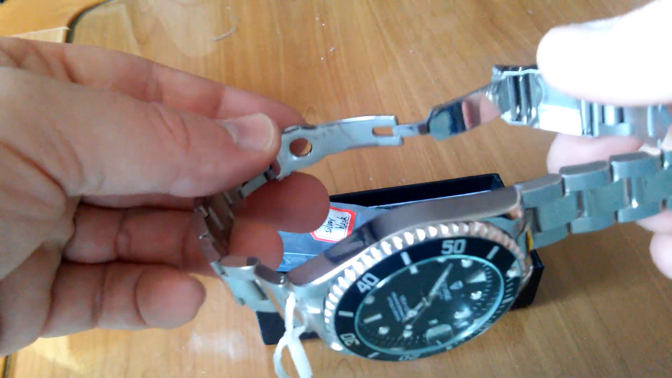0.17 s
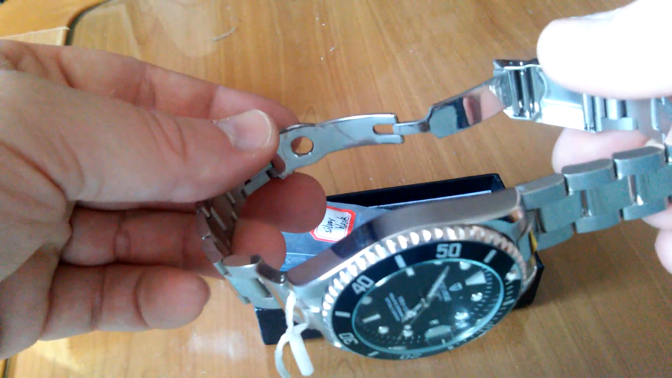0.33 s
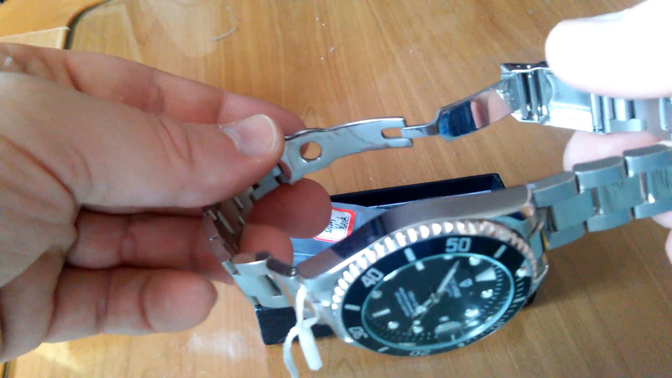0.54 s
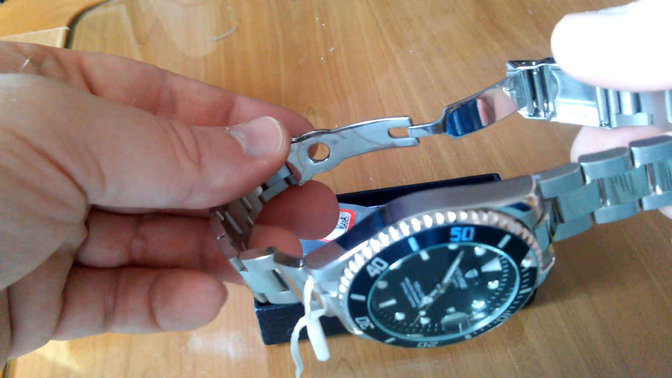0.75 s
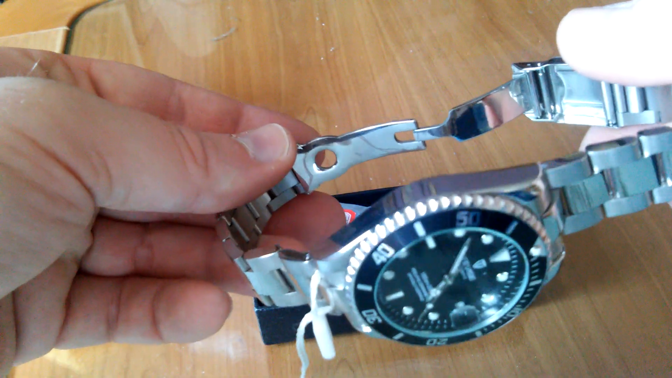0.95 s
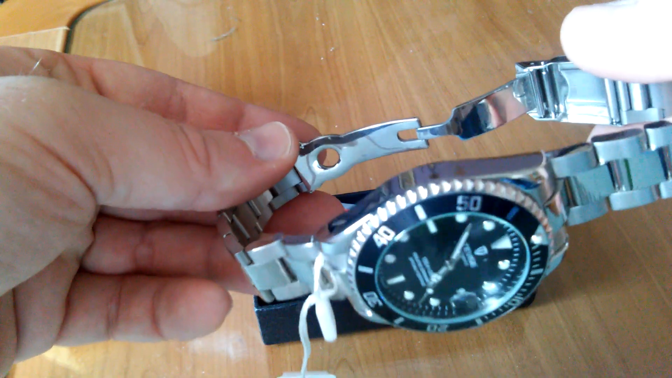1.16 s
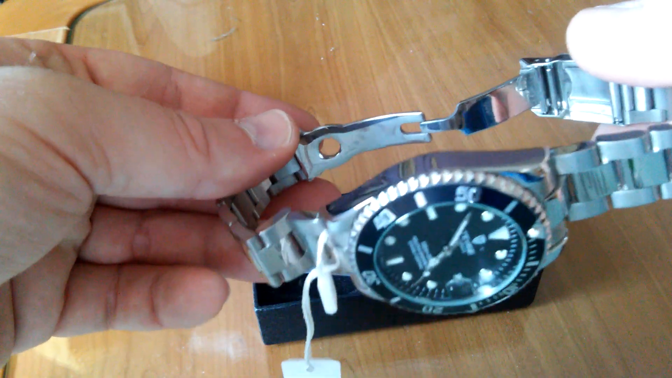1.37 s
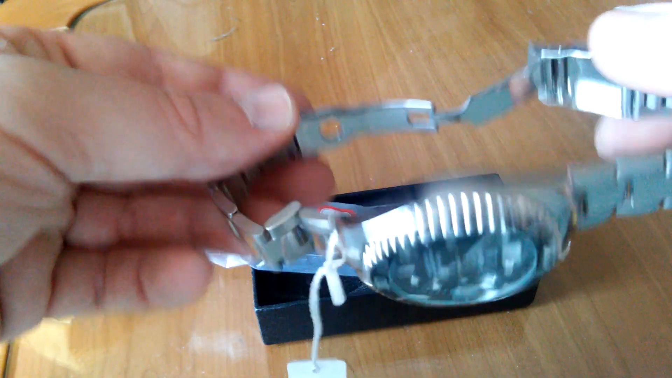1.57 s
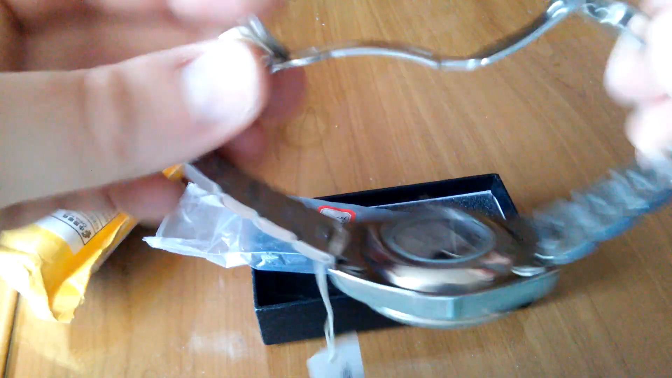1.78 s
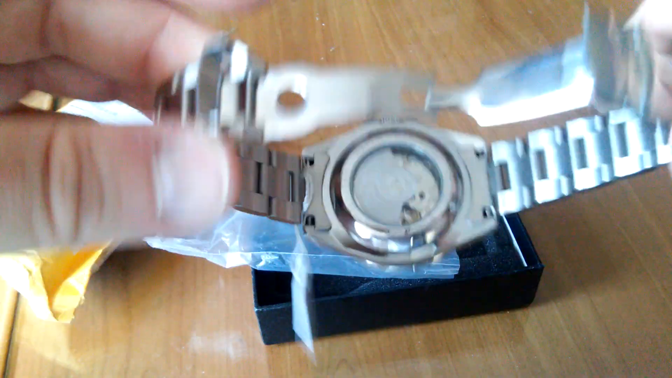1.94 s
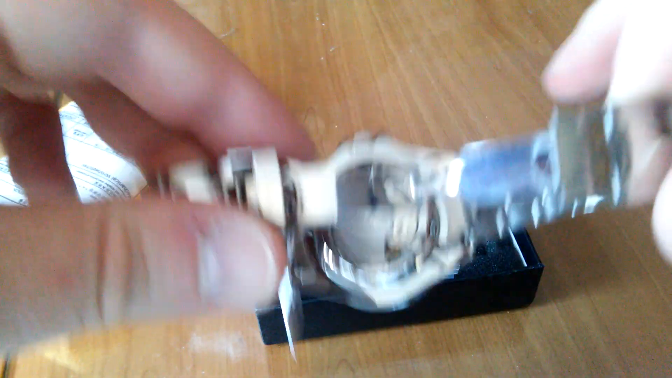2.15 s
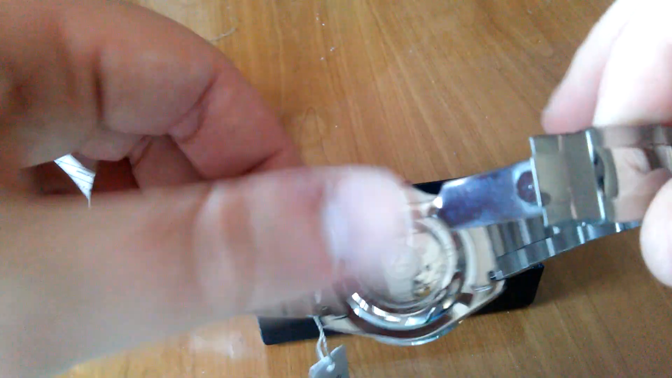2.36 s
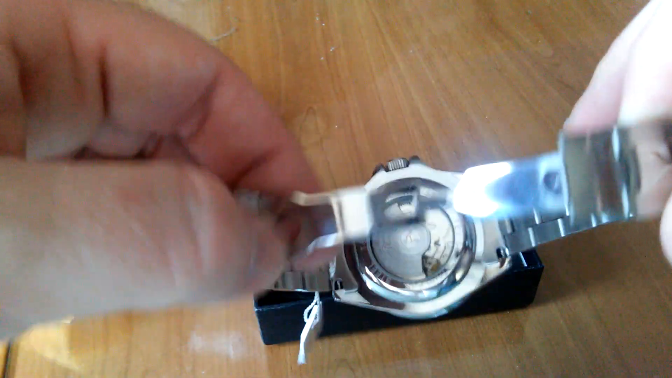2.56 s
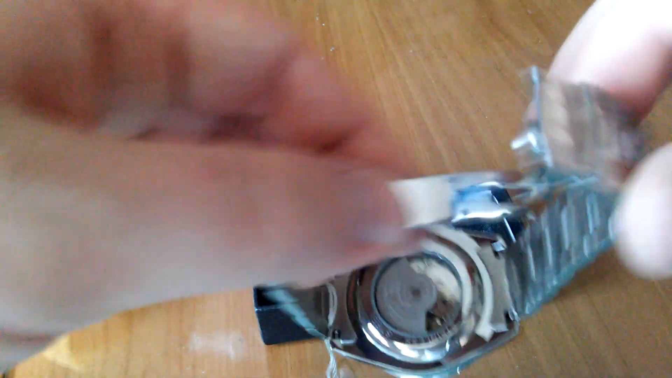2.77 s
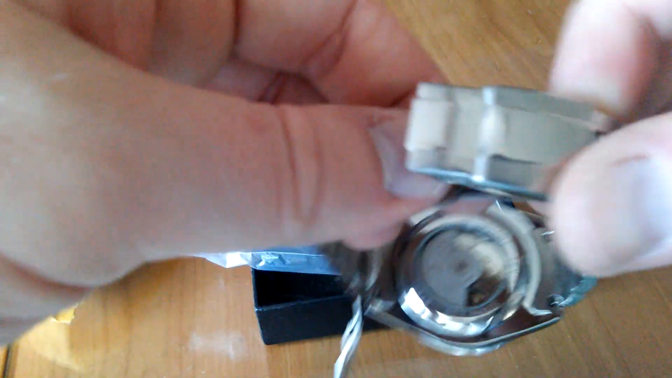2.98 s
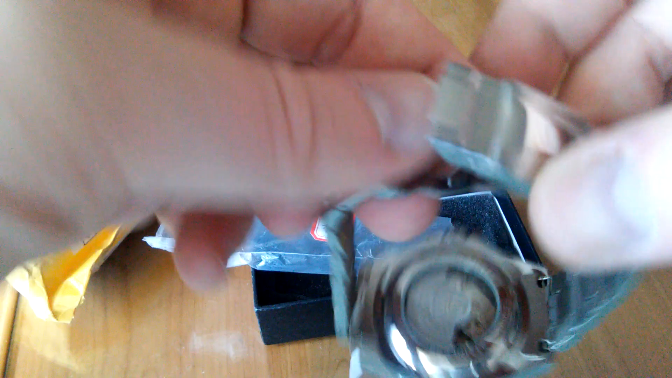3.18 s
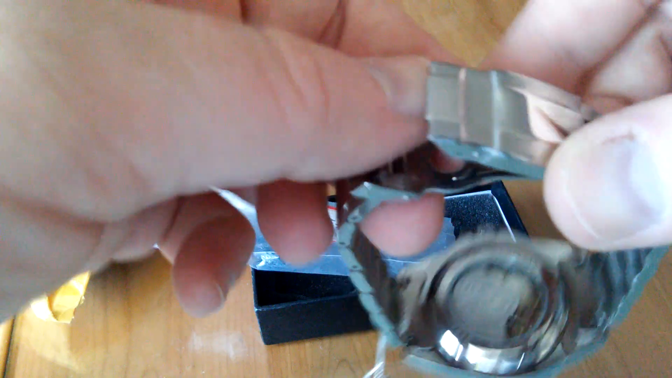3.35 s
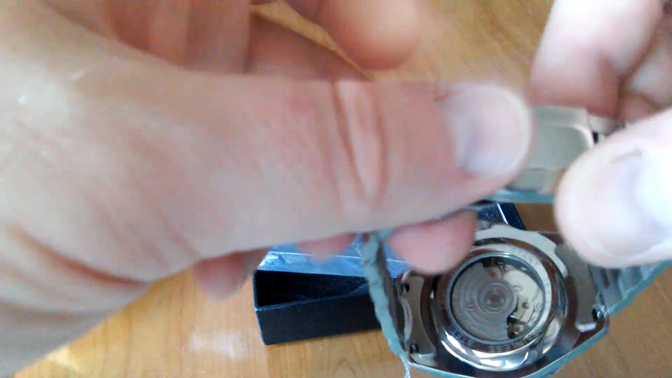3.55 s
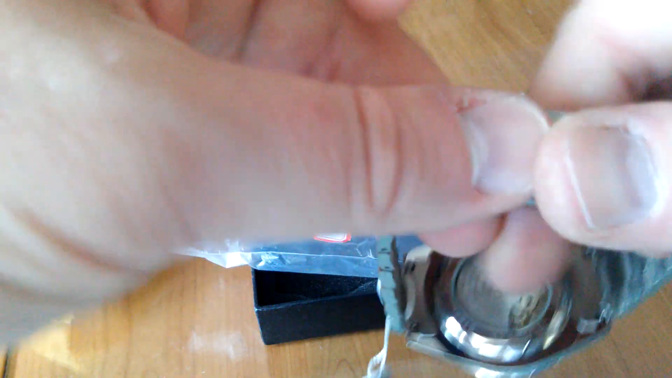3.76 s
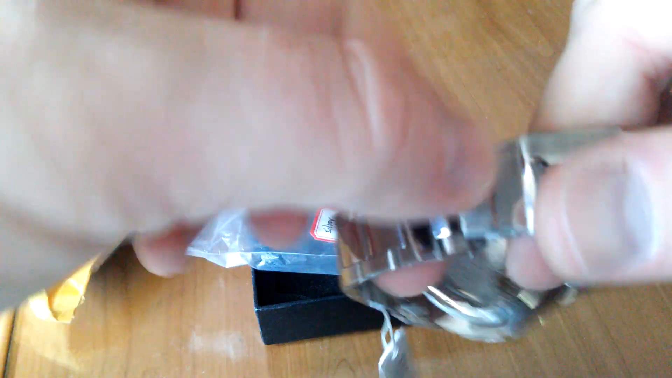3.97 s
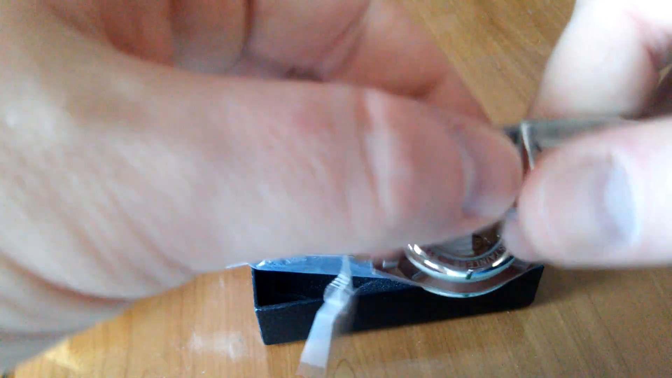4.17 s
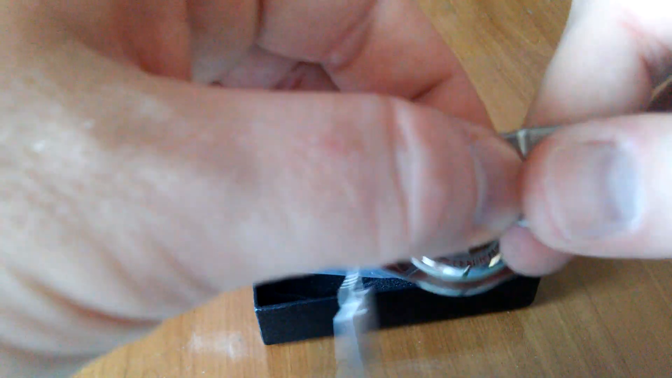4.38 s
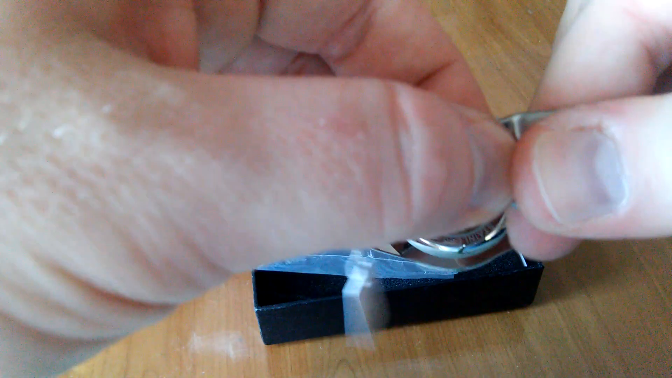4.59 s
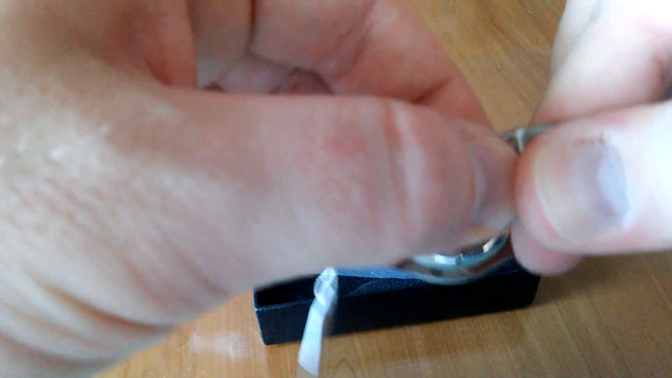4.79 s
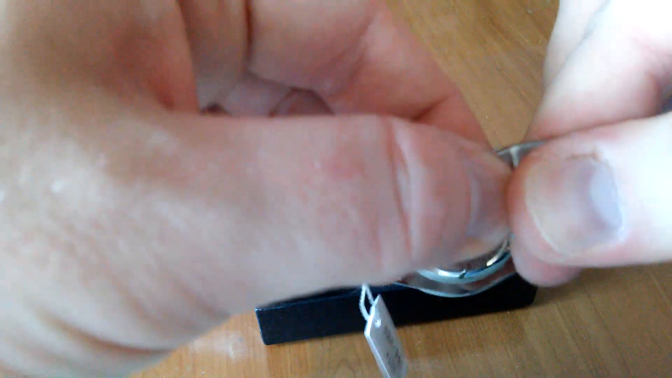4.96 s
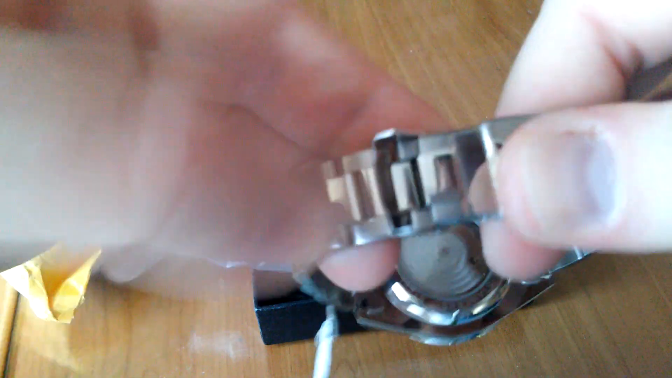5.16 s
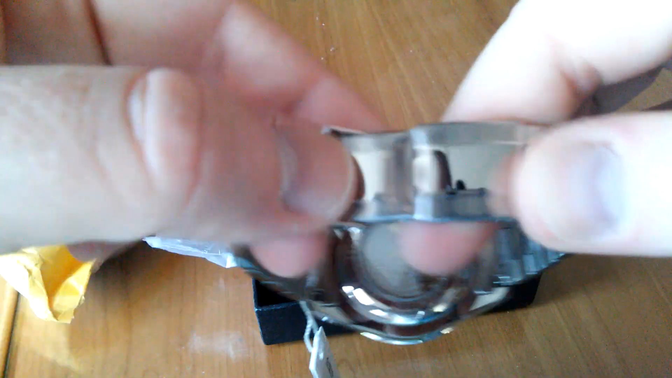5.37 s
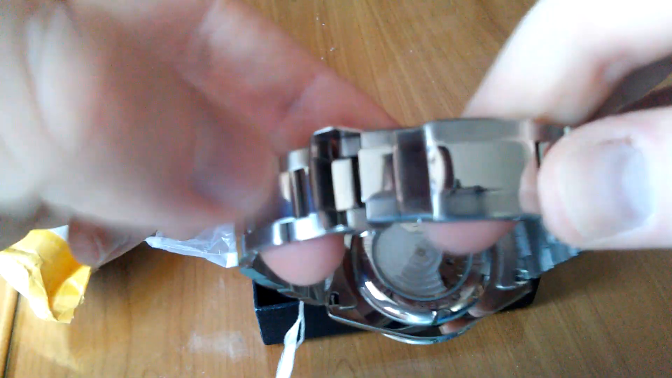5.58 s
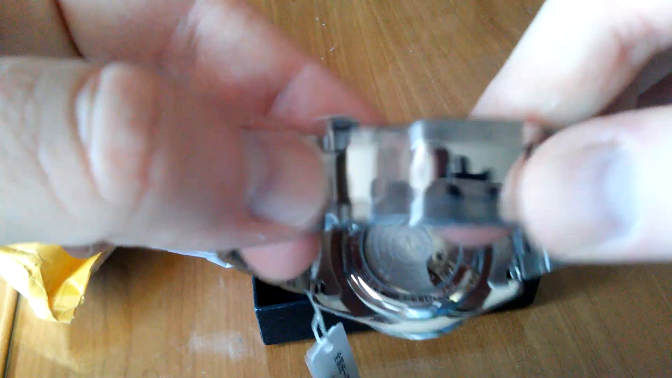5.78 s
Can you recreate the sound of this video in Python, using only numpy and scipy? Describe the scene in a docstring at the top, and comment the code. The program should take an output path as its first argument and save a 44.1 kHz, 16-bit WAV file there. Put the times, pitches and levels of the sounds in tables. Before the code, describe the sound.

Handling of a metal watch over a table: nearly two seconds of quiet hiss and faint rasps, then sparse ticks growing into sharp, glassy clicks with light box taps. Near the end a hard clasp snap distorts and briefly blanks the close microphone, leaving a bright room tail, low thuds and a last run of link clicks.

```python
"""Faint rasps over hiss and low table rumble come first; then a steel watch bracelet turns in the hands.
Link clicks, knocks on a cardboard box and the snap are bursts of noise through resonances,
rubbing is steadier noise through such resonances, and wrist thuds are short low sines.
The clasp snaps shut so hard that the close microphone goes deaf for a moment and lurches back.
A synthetic room answers clicks, knocks and snap; coarse level steps and a steep treble limit come last."""
import sys
import numpy as np
from scipy import signal
from scipy.fft import rfft, irfft, next_fast_len
from scipy.io import wavfile
from scipy.ndimage import uniform_filter1d

SR = 44100
rng = np.random.default_rng(int(sys.argv[2]) if len(sys.argv) > 2 else 0)


def store_wav(level_fs):
    """Save 16-bit WAV to argv[1]."""
    pcm = np.round(np.clip(np.atleast_2d(level_fs), -1, 1) * 32767)
    wavfile.write(sys.argv[1], SR, pcm.T.astype(np.int16))


N = 257103

# Link clicks: (time [s], bright ring peak [dB], bright ring pitch [Hz], housing ring under it [dB],
# chatter t60 [s], room energy against the near sound [dB])
LINK_CLICKS = [(1.7887, -54, 12500, -31, .013, -19), (1.9318, -47.5, 9600, -21, .01, -8),
               (1.9517, -49.5, 11600, -32, .011, -16), (2.0522, -52.5, 12800, -26, .012, -12),
               (2.2399, -37, 13600, -23.5, .009, -15), (2.4045, -46, 11300, -32, .012, -8),
               (2.4164, -49, 11600, -25, .012, -12), (2.4329, -32, 8740, -13.5, .012, -1),
               (2.5552, -35.5, 10000, -36, .019, -22), (2.5624, -44, 13300, -29, .012, -17),
               (2.6002, -40, 13500, -32, .013, -11), (2.608, -44, 12200, -19, .012, -18),
               (2.6214, -45, 11300, -20, .012, -17), (2.6398, -33, 13000, -25, .01, -8),
               (2.6615, -11, 12850, -26.5, .01, -17), (2.829, -48, 8500, -35, .008, -15),
               (2.926, -47, 9470, -21, .016, -10), (2.9358, -32, 11200, -30, .016, -6),
               (2.9552, -38, 10100, -20, .012, -5.5), (2.9731, -41, 14300, -15, .014, -11),
               (2.9907, -36.5, 11600, -22, .012, -13), (3.1038, -32, 12500, -25, .008, -17.5),
               (3.175, -3, 13570, -29, .015, -12.5), (3.2944, -35, 12300, -10, .007, -13.5),
               (3.3814, -32, 14400, -32, .009, -11), (3.3845, -23, 13900, -23.5, .016, -15),
               (3.4214, -27.5, 11400, -20, .025, -23), (3.436, -19.5, 10300, -30, .036, -16.5),
               (3.456, -11, 11400, -26, .03, -6), (3.5663, -27.5, 12000, -21, .016, -16.5),
               (3.5999, 1.5, 11900, -36, .009, -17), (3.625, -24, 13700, -37, .013, -14),
               (3.641, -28.5, 12300, -33, .012, -12), (3.693, -28, 11300, -30.5, .013, -10.5),
               (3.7125, -32, 12100, -38, .016, -9), (3.8217, -39.5, 12550, -40, .017, -4),
               (3.8466, -37, 13500, -36.5, .012, -4), (3.8607, -37.5, 8900, -31, .009, -19),
               (3.9098, -46, 9050, -34, .009, 0), (3.934, -34, 14300, -23, .013, -15),
               (4.0056, -44, 11320, -40, .01, -6), (4.0203, -30, 12670, -42, .018, -11.5),
               (4.3926, -1.5, 10000, -16, .0075, -16), (4.4439, -25, 12500, -26, .012, -19),
               (4.4683, -13, 11500, -25.5, .007, -28), (4.5937, -49, 11780, -29, .018, -5),
               (5.202, -33, 8000, -30, .015, -15), (5.2251, -27, 9510, -31, .018, -17.5),
               (5.2659, -8, 9700, -28, .01, -22.5), (5.3254, -28, 9420, -43, .011, -15),
               (5.3684, -23.5, 11200, -20, .012, -12), (5.3765, -19, 9640, -15, .01, -6),
               (5.3843, -30, 13100, -8, .012, -15), (5.404, -20, 10500, -20.5, .011, -8),
               (5.439, -23, 13300, -28.5, .013, -16.5), (5.5101, -9, 13000, -50, .009, -19),
               (5.519, -23, 13400, -20, .008, -4.5), (5.5593, -27.5, 10370, -45, .014, -14.5),
               (5.5812, -23, 12800, -49, .018, -20), (5.6125, -40, 14000, -32, .011, -9),
               (5.657, -38, 10100, -36, .011, -17), (5.726, -42, 11830, -27, .011, -1),
               (5.8151, -33, 13300, -18, .01, -3)]
LOW_RING_DB, LOW_PER_DB, LOW_SCATTER_DB = -23, -.15, 4  # lower ring: at a 0 dB blow, per dB of blow, chance
BODY_DB, BODY_PER_DB = -23.5, .16  # dull body, before the noise drives it: at a 0 dB blow, per dB of blow
# Ring of the microphone housing: (pitch [Hz], t60 [s], sharp at first by [Hz], settling time constant [s])
HOUSING_RING = (4100, 0.02, 900, 0.0012)
# The clasp: (time [s], crack peak [dB], crack rise [s], housing ring [dB], room answer [dB])
CLASP_SNAP = (4.9795, -1, .0003, -13.5, -17.5)
# Microphone deafness: (start [s], end [s], held offset before smoothing [full scale])
MIC_DEAF = (4.9812, 5.0115, .11)
# Lurches of the overloaded microphone: (time [s], size before smoothing [full scale], rise [s])
MIC_LURCHES = [(4.9799, -.62, .0005), (4.9813, .24, .002), (4.9995, .09, .0016), (5.0122, .16, .0022),
               (5.023, -.135, .047), (5.12, .02, .07)]
# Colour of the room's answer to the clasp: (frequency [Hz], level [dB per Hz])
CLASP_ECHO_COLOUR = [(180, -80.5), (300, -35), (584, -24.5), (737, -21.5), (900, -13), (1100, -10),
                     (1190, -14), (2740, -14.5), (3700, -21), (4600, 0), (5200, 3), (5900, -9), (6850, -12),
                     (9500, -4), (12100, 4), (15000, -1.5), (16000, -7.5)]
# Knocks on the box: (time [s], lid peak [dB], bottom thump under it [dB], rattle t60 [s],
# room energy against the near sound [dB])
BOX_KNOCKS = [(2.428, -26.5, -26, 0.031, -3), (2.433, -32, -8, 0.05, -8), (2.464, -33, -15, 0.036, -8),
              (2.943, -37, -9.5, 0.031, 0), (2.954, -33.5, -14.5, 0.059, -12.5),
              (3.421, -32.5, -16, 0.034, -13), (3.438, -12.5, -26.5, 0.017, -11.5),
              (3.456, -13.5, -21, 0.029, -8.5), (5.369, -14.5, -25, 0.019, -12),
              (5.384, -18, -24, 0.04, -10.5), (5.523, -27, -33, 0.022, -13.5),
              (5.816, -42, -20, 0.025, -14), (5.827, -35, -44, 0.027, -10)]
# Modes of the cardboard box: (frequency [Hz], width before any blur [Hz], level before scatter [dB])
BOX_MODES = [(233, 24, -5), (387.4, 45, -6.5), (735, 28, 3.5), (929.5, 38, -8), (1102, 22, -7),
             (1390, 96, -3.5), (1877, 70, 4), (2045, 230, -5), (2320, 97, 0), (2626, 150, -5.5),
             (3040, 510, -12.5), (3560, 120, -11)]
# The watch drags over the box: (time [s], level [dB])
DRAG_LEVEL = [(3.5, -100), (3.65, -66), (3.75, -72), (3.87, -62), (3.94, -68), (4.0, -100)]
# Links sliding on each other: (time [s], level [dB])
SLIDE_LEVEL = [(0, -100), (1.7, -98), (1.95, -84), (2.2, -90), (2.4, -86), (2.6, -66), (2.9, -73),
               (3.3, -74), (3.75, -65.5), (3.9, -62), (4.0, -70), (4.08, -64), (4.2, -90), (4.6, -84),
               (4.75, -95), (5.5, -89), (5.68, -58), (5.8, -90)]
# Soft wrist thuds on the table: (time [s], envelope peak [dB], pitch [Hz])
WRIST_THUDS = [(1.621, -78, 166.6), (2.28, -64, 97), (2.77, -66, 165), (3.19, -65, 172),
               (3.83, -55.5, 169.6), (4.22, -67.5, 164.8), (4.44, -58, 164), (4.58, -60, 105.4),
               (5.1, -42, 105.6), (5.179, -42, 96.8), (5.25, -48, 84)]
THUD_RISE_S = .02
# The table hums on after the snap: (time [s], envelope peak [dB], pitch [Hz], rise [s])
TABLE_HUM = (5.3, -59, 82, .22)
# Hands on the table: (time [s], rumble level [dB])
HAND_RUMBLE = [(0, -94), (.5, -87), (.8, -90), (1.25, -76), (1.5, -78), (2.0, -87), (2.2, -77), (2.72, -72),
               (3.1, -83), (3.22, -67), (3.35, -77), (3.75, -72), (3.95, -64), (4.2, -80), (4.45, -68),
               (4.62, -67), (4.72, -76), (5.83, -80)]
SHAKE_DB, SHAKE_RISE_S = -45, .045  # a box knock shakes the table: level against the knock, rise
# The clasp shakes the table too: (time [s], level [dB], rise [s])
CLASP_SHAKE = (5.05, -49, .09)
# Faint rasps far off: (time [s], level [dB], length [s])
FAR_RASPS = [(0.565, -85, 0.11), (0.949, -81, .12), (1.334, -80, .07), (1.699, -80, 0.087),
             (2.053, -87, .08), (2.769, -77, 0.062), (4.205, -77, 0.098)]
# Colour of the microphone's hiss: (frequency [Hz], relative level [dB per Hz])
HISS_COLOUR = [(71, -44.5), (120, -15.5), (160, -5), (336, -18), (413, -18), (600, -19), (740, -11),
               (900, -19), (1710, -19), (14900, -20), (16500, -24.5)]
HISS_DB = -88
# Room decay before any lingering: (frequency [Hz], t60 [s])
ROOM_DECAY = [(200, 0.24), (1000, 0.29), (2500, 0.32), (5000, 0.37), (10000, 0.37), (16000, 0.27)]
# The room's answer against the near sound: (frequency [Hz], level [dB])
ROOM_TINT = [(200, 1.5), (1000, 4), (3000, 3.5), (6000, -5.5), (16000, -6.5)]
WALL_S = .0105  # delay of the first wall answer [s]
STEP = .00046  # the converter's coarse step [full scale]
TOP_HZ = 17150  # nothing passes from here up


def clicks():
    """Steel on steel: brief chatter drives two broad rings and a dull body; the housing rings on."""
    s, db, hz, housing_db, t60, room_db = np.transpose(LINK_CLICKS)[:, :, None]
    low_db = LOW_RING_DB + LOW_PER_DB * db + LOW_SCATTER_DB * rng.standard_normal(db.shape)
    t = np.arange(SR // 20) / SR
    onset = 1 - np.exp(-t / .0001)
    chatter = rng.standard_normal((len(s), len(t))) * amp(-60 * t / t60) * onset
    width = np.interp(db, [-45, -5], [2000, 8000])  # a harder blow wakes more of the link

    def steel(f):
        high = peak(f, hz, width) * peak(f, 13700, 7200)
        return high - amp(low_db) * peak(f, 6200, 2800) ** 2

    def body(f):
        return amp(BODY_DB + BODY_PER_DB * db) * peak(f, 2200, 3600)

    def spread(f):
        housing = amp(housing_db + 7) * np.abs(peak(f, 4400, 1100)) ** 2
        return np.abs(steel(f)) + housing + amp(-7) * np.abs(body(f))

    bright = top_at_one(filtered(chatter, steel))
    near = amp(db) * (bright + housing_ring(t, housing_db) + filtered(chatter, body))
    return placed(s[:, 0], near, spread, room_db)


def housing_ring(t, db):
    """The housing starts sharp and slides down to its pitch as it dies away."""
    hz, t60, sharp_hz, settle = HOUSING_RING
    turns = hz * t + sharp_hz * settle * (1 - np.exp(-t / settle))
    onset = 1 - np.exp(-t / 0.0017)
    return amp(db - 60 * t / t60) * onset * np.sin(2 * np.pi * turns)


def overload():
    """The snap itself: a noise crack, the housing ring, and the offset and lurches of the stunned microphone."""
    s, crack_db, rise, ring_db, _ = CLASP_SNAP
    time = np.arange(N) / SR
    t = np.clip(time - s, 0, None)
    burst = rng.standard_normal(N) * swing(t / rise)
    crack = top_at_one(filtered(burst, lambda f: peak(f, 6000, 21000) - .8 * peak(f, 1800, 2500)))
    held = MIC_DEAF[2] * np.interp(time, [4.983, 5.000, 5.016, 5.022], [0, 1, 1, 0])
    lurch = sum(size * swing((time - at) / slow) for at, size, slow in MIC_LURCHES)
    smooth = filtered(held + lurch, lambda f: 1 / (1 + 1j * f / 4000) ** 2)
    return amp(crack_db) * crack + housing_ring(t, ring_db) + smooth


def snap_echo():
    """The room rings on after the clasp shuts: a coloured noise tail that lingers longer than usual."""
    out = np.zeros(N + SR)
    tail = filtered(tails(1, linger=1.15)[0], lambda f: amp(along(CLASP_ECHO_COLOUR, f)))
    tail /= np.sqrt(np.mean(tail[1500:4000] ** 2))  # level is set on an early stretch
    out[round((CLASP_SNAP[0] + WALL_S) * SR):][:len(tail)] = amp(CLASP_SNAP[4]) * tail
    return out[:N]


def knocks():
    """A short scrape drives the box's modes at new strengths each time; the bottom swells later."""
    s, db, thump_db, rattle, room_db = np.transpose(BOX_KNOCKS)[:, :, None]
    t = np.arange(SR // 5) / SR
    noise = rng.standard_normal((len(s), len(t)))
    scatter = amp(1.54 * rng.standard_normal((len(s), len(BOX_MODES))))

    def modes(f, low, blur=1):
        total = 0
        for k, (hz, width, level) in enumerate(BOX_MODES):
            if (hz < 500) == low:
                total = total + (-1) ** k * amp(level) * scatter[:, [k]] * peak(f, hz, blur * width)
        return total

    def clatter(f):  # too many small modes to tell apart
        return amp(-15) * peak(f, 1700, 2200) ** 2

    def spread(f):
        low = amp(thump_db + 8) * np.abs(modes(f, True, blur=1.6))
        return np.abs(modes(f, False, blur=3.5)) + np.abs(clatter(f)) + low

    lid = top_at_one(filtered(noise * amp(-60 * t / rattle), lambda f: modes(f, False) + clatter(f)))
    bottom = top_at_one(filtered(noise * t * np.exp(-t / 0.0086), lambda f: modes(f, True) ** 2))
    return placed(s[:, 0], amp(db) * (lid + amp(thump_db) * bottom), spread, room_db)


def dragging():
    """A soft, uneven rub keeps the box's modes murmuring."""
    noise, lumps = rng.standard_normal((2, N))
    rub = noise * amp(3 * unit(uniform_filter1d(lumps, size=300)))

    def box(f):
        return sum((-1) ** k * amp(db) * peak(f, hz, 1.5 * width)
                   for k, (hz, width, db) in enumerate(BOX_MODES))

    return amp(curves(DRAG_LEVEL)[0]) * unit(filtered(rub, box))


def sliding():
    """Links rub: a bright noise whisper roughened by sparse tiny ticks."""
    strength = amp(3.5 * rng.exponential(size=N).clip(0, 4))
    ticks = (rng.random(N) < 250 / SR) * strength  # about 250 a second
    roughness = 1 + 0.62 * signal.lfilter([1], [1, -.96], ticks)
    rub = rng.standard_normal(N) * roughness
    return amp(curves(SLIDE_LEVEL)[0]) * unit(filtered(rub, lambda f: peak(f, 11500, 7600) ** 2))


def wrist_thuds():
    """Wrist thuds and the table's hum: low sines that swell and die away."""
    t = np.arange(N) / SR
    tones = [(*row, THUD_RISE_S) for row in WRIST_THUDS] + [TABLE_HUM]
    return sum(amp(db) * swing((t - s) / rise) * np.sin(2 * np.pi * hz * (t - s))
               for s, db, hz, rise in tones)


def table_rumble():
    """Hands, knocks and clasp shake the table: noise through its low resonances."""
    t = np.arange(N) / SR
    hand_noise, knock_noise = rng.standard_normal((2, N))
    clasp_s, clasp_db, clasp_rise = CLASP_SHAKE
    level = amp(curves(HAND_RUMBLE)[0]) + amp(clasp_db) * swing((t - clasp_s) / clasp_rise)
    deep = unit(filtered(hand_noise, lambda f: peak(f, 66, 50) ** 2 + 0.4 * peak(f, 37, 21)))
    shake = sum(amp(db + SHAKE_DB) * swing((t - s) / SHAKE_RISE_S) for s, db, *_ in BOX_KNOCKS)
    jolt = unit(filtered(knock_noise, lambda f: peak(f, 75, 70) ** 2 + 1.2 * peak(f, 140, 90) ** 2))
    return level * deep + shake * jolt


def rasps():
    """Far-off rasps: rough pulses, 150 a second, through two narrow throat-like rings."""
    t = np.arange(N) / SR
    gate = 0
    for s, db, length in FAR_RASPS:
        fade_in = np.clip((t - s) / 0.0064, 0, 1)
        fade_out = np.clip((s + length - t) / 0.034, 0, 1)
        gate = gate + amp(db) * fade_in * fade_out
    pulses = np.diff(np.floor(150 * t), prepend=0) * 17 + 1.3 * rng.standard_normal(N)
    return gate * unit(filtered(pulses, lambda f: peak(f, 1340, 410) ** 2 + 0.39 * peak(f, 2300, 370) ** 2))


def microphone_hiss():
    """The microphone's own hiss: steady coloured noise."""
    return amp(HISS_DB) * unit(filtered(rng.standard_normal(N), lambda f: amp(along(HISS_COLOUR, f))))


def tails(count, linger=1):
    """Room answers of energy 1, a fresh one per sound; each frequency dies at its own speed."""
    noise, lumps = rng.standard_normal((2, count, SR // 2))
    early = np.exp(-np.arange(SR // 2) / SR / .08)  # single reflections stand out at first
    lumpy = noise * amp(2.5 * early * unit(uniform_filter1d(lumps, size=40)))
    hz, t, z = signal.stft(lumpy, SR, nperseg=256)
    decay = amp(-60 * t / (linger * along(ROOM_DECAY, hz)[:, None]))
    x = signal.istft(z * decay, SR, nperseg=256)[1][:, :SR // 2]
    return x / np.linalg.norm(x, axis=1, keepdims=True)


def placed(times, sounds, spread, room_db):
    """Each sound at its time, one wall echo, then the room, coloured by what the thing spreads to all sides."""
    out = np.zeros(N + SR)
    wet = filtered(tails(len(sounds)), lambda f: np.abs(spread(f)) * amp(along(ROOM_TINT, f)))
    near_size = np.linalg.norm(sounds, axis=1, keepdims=True)
    wet *= amp(room_db) * near_size / np.linalg.norm(wet, axis=1, keepdims=True)
    for s, near, far in zip(times, sounds, wet):
        wall = round((s + WALL_S) * SR)
        out[round(s * SR):][:len(near)] += near
        out[wall:][:len(near)] += amp(-22) * near
        out[wall:][:len(far)] += far
    return out[:N]


def peak(f, hz, width_hz):
    """A causal resonance."""
    return 1j * f * width_hz / (hz * hz - f * f + 1j * f * width_hz)


def swing(u):
    """Rises to 1 at u = 1 and dies away."""
    return np.clip(u, 0, None) * np.exp(1 - np.clip(u, 0, None))


def filtered(x, response):
    """x shaped by a response over frequency."""
    n = x.shape[-1]
    m = next_fast_len(n + SR // 4)
    return irfft(rfft(x, m) * response(np.fft.rfftfreq(m, 1 / SR)), m)[..., :n]


def amp(db):
    """Decibels to amplitude."""
    return 10 ** (np.asarray(db) / 20)


def unit(x):
    """x at RMS 1."""
    return x / np.sqrt(np.mean(x ** 2, axis=-1, keepdims=True) + 1e-20)


def top_at_one(x):
    """x with its highest peak at 1."""
    return x / np.abs(x).max(axis=-1, keepdims=True)


def along(points, hz):
    """(frequency [Hz], value) points read on a log frequency axis."""
    f, v = np.transpose(points)
    return np.interp(np.log(hz + 1), np.log(f + 1), v)


def curves(rows):
    """One value per sample for each column after the time."""
    s, *cols = np.transpose(rows)
    return [np.interp(np.arange(N) / SR, s, c) for c in cols]


def scene():
    """Everything that reaches the microphone, plus its hiss; the direct snap joins in record()."""
    handling = clicks() + snap_echo() + knocks() + dragging() + sliding()
    return (handling + wrist_thuds() + table_rumble() + rasps() + microphone_hiss())[None]


def record(dry):
    """The deaf microphone blocks the scene and wakes by degrees; coarse steps and a steep band limit follow."""
    time = np.arange(N) / SR
    start, end, _ = MIC_DEAF
    awake = np.interp(time, [start - .001, start, end, end + .002, end + .04], [1, 0, 0, .7, 1])
    heard = STEP * np.floor(np.clip(dry * awake + overload(), -1, 1) / STEP)

    def band_limit(f):  # droops, then falls
        edge_db = np.interp(f, [15500, 15800, 16100, 16500, TOP_HZ], [0, -4, -21, -26, -70])
        return amp(edge_db) * (f < TOP_HZ)

    return filtered(heard, band_limit)


dry = scene()
out = record(dry)
store_wav(out)
```